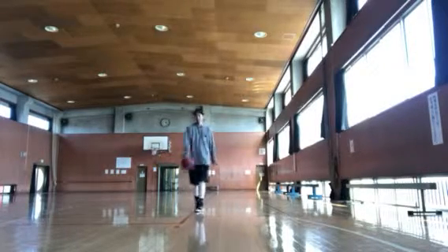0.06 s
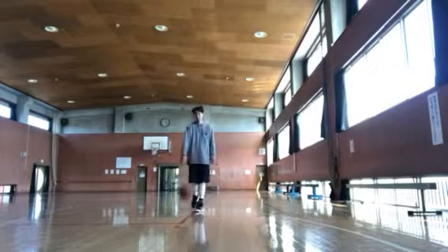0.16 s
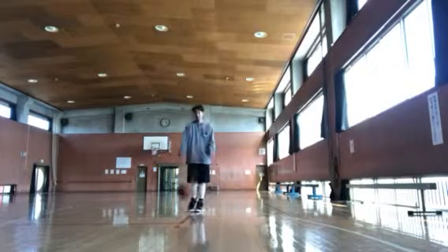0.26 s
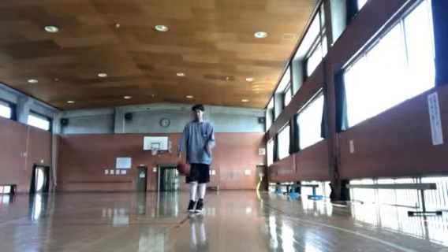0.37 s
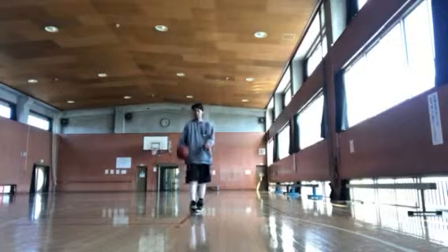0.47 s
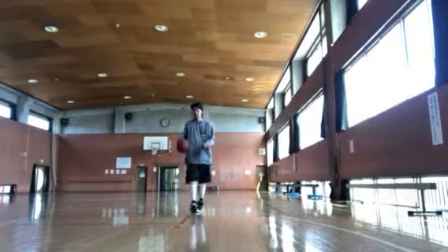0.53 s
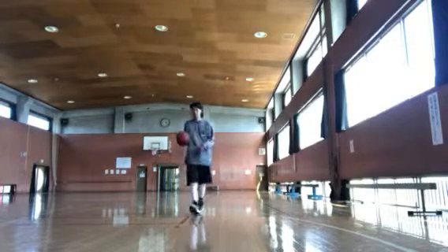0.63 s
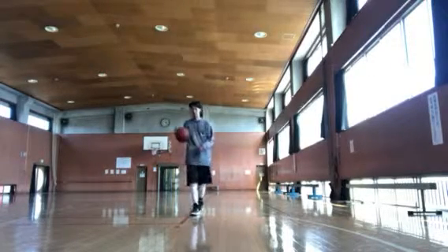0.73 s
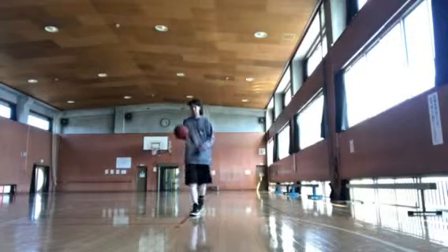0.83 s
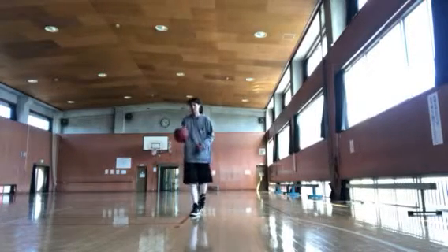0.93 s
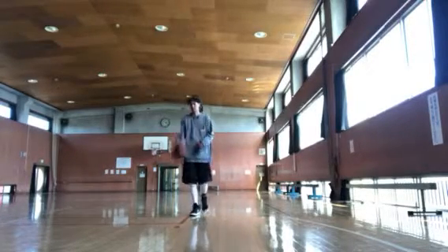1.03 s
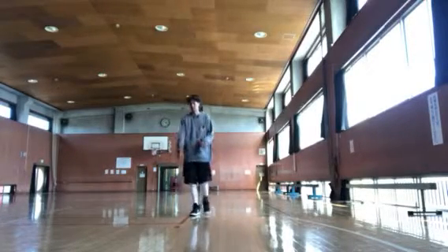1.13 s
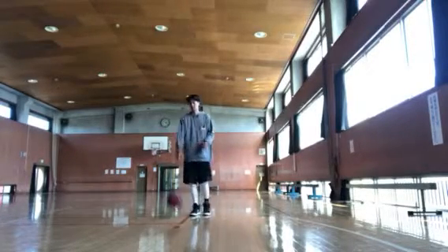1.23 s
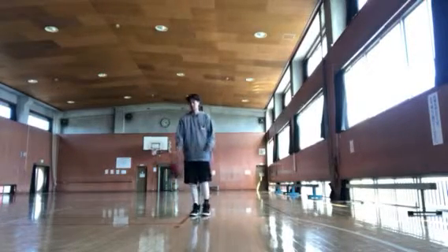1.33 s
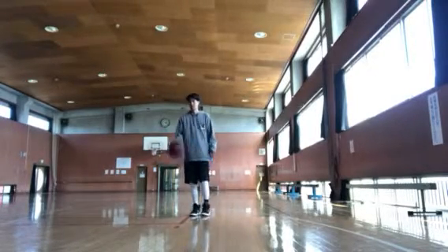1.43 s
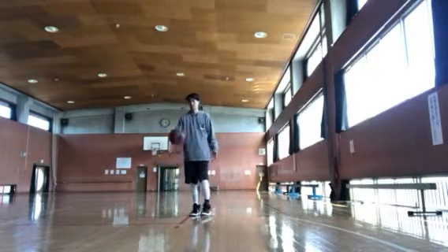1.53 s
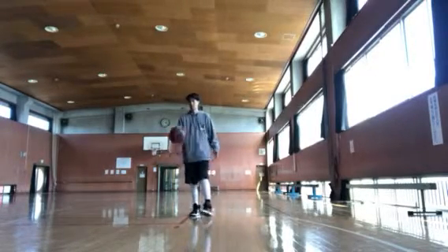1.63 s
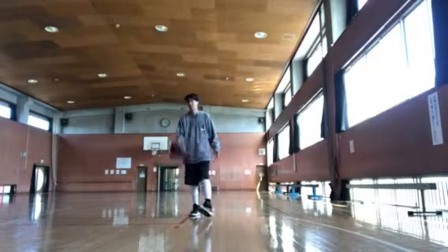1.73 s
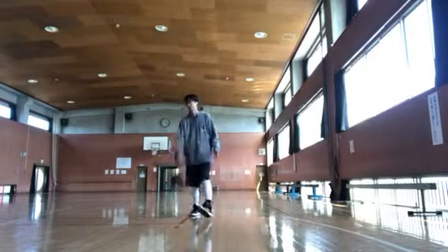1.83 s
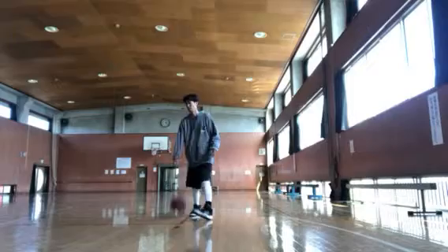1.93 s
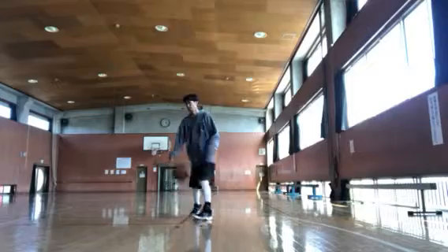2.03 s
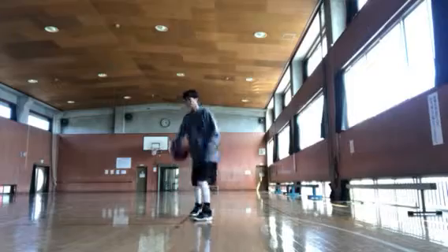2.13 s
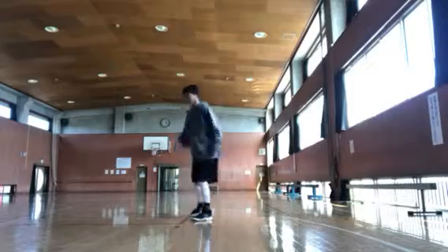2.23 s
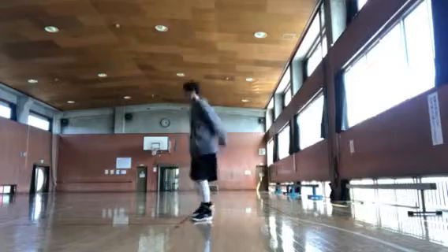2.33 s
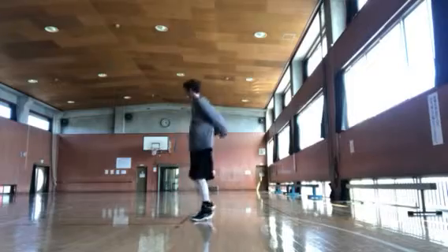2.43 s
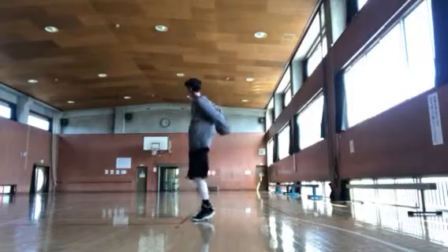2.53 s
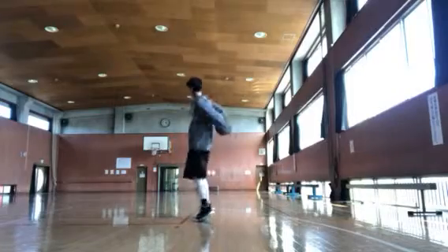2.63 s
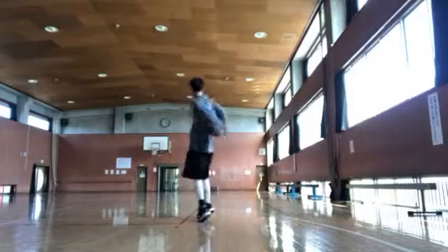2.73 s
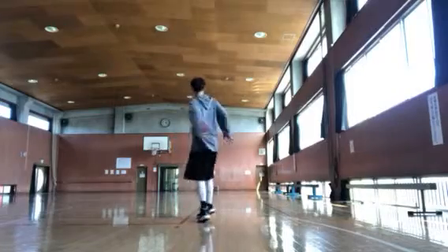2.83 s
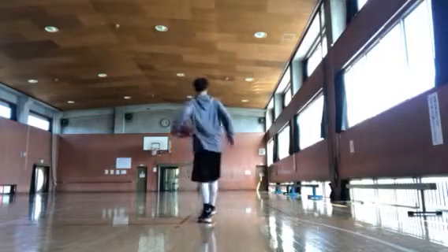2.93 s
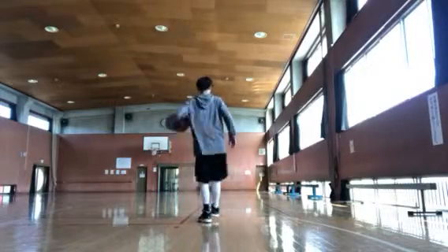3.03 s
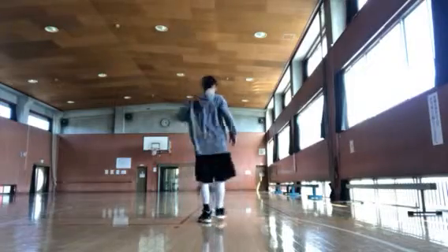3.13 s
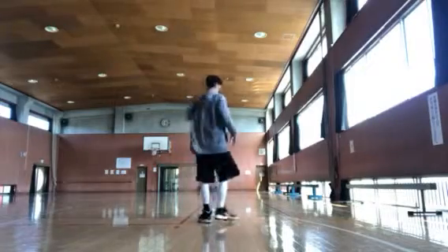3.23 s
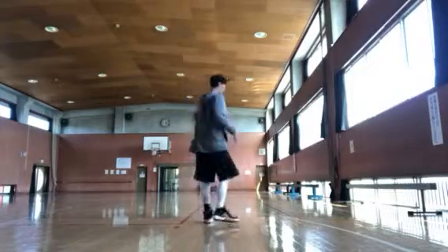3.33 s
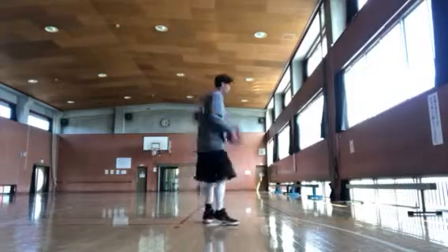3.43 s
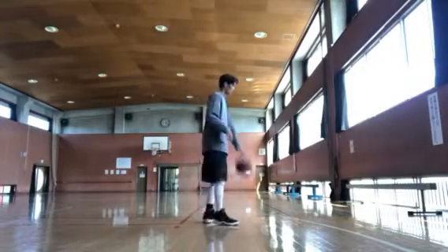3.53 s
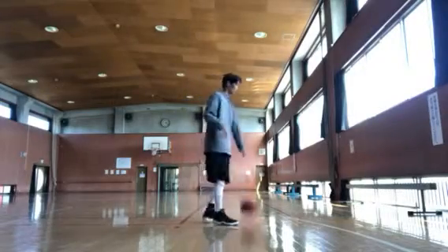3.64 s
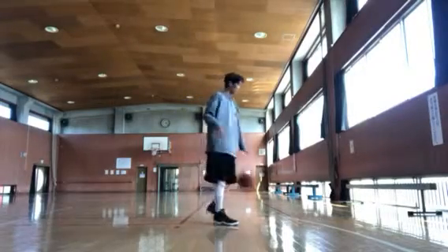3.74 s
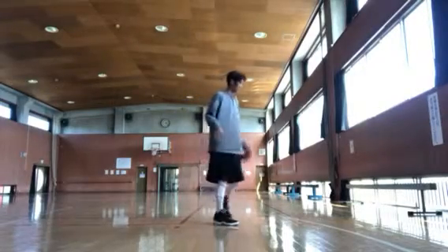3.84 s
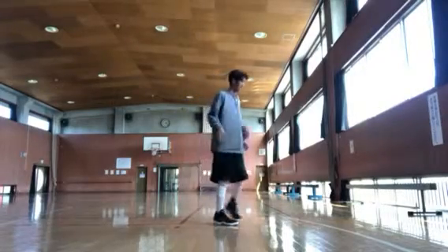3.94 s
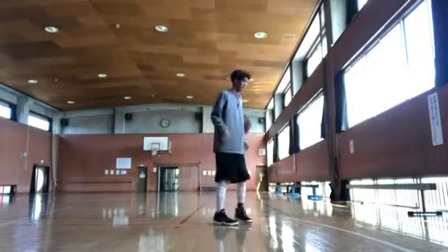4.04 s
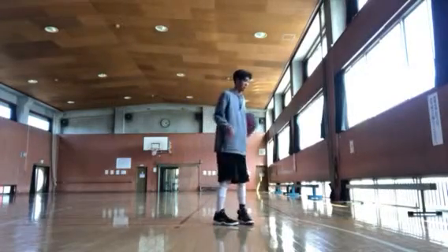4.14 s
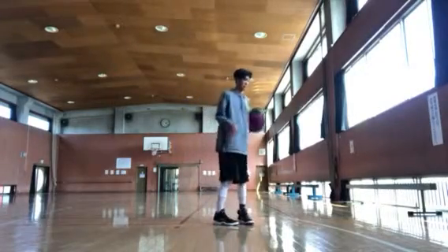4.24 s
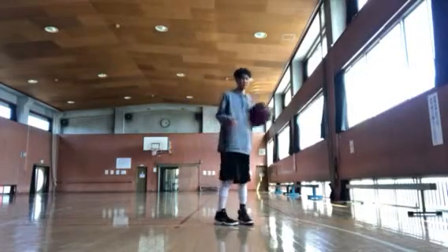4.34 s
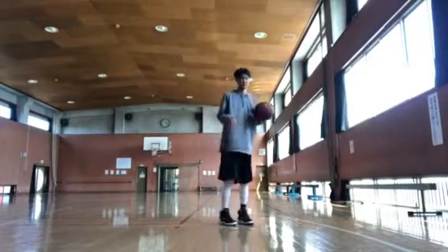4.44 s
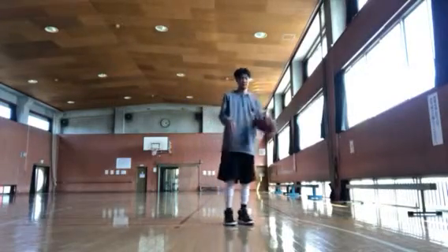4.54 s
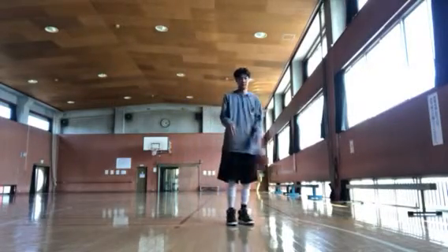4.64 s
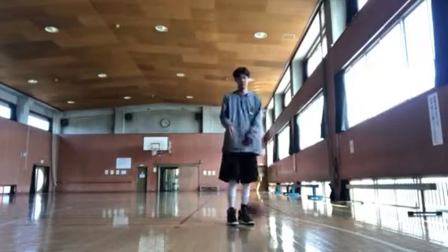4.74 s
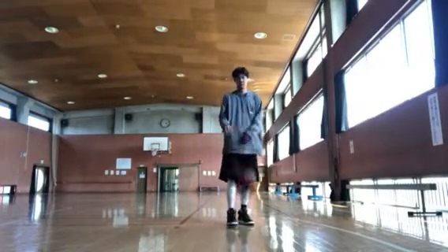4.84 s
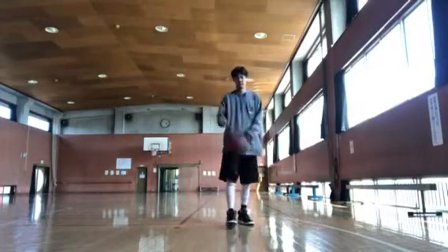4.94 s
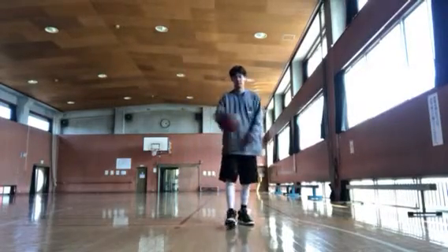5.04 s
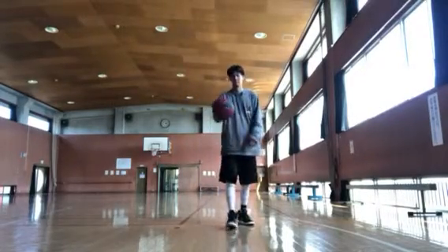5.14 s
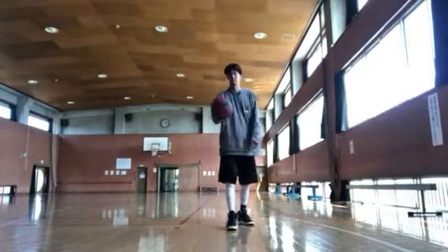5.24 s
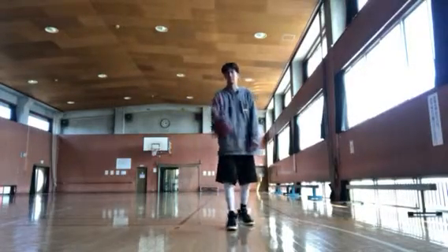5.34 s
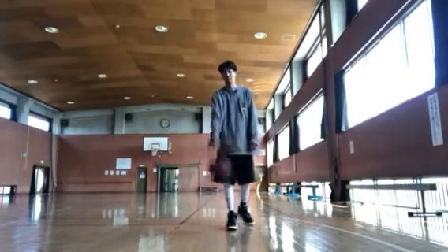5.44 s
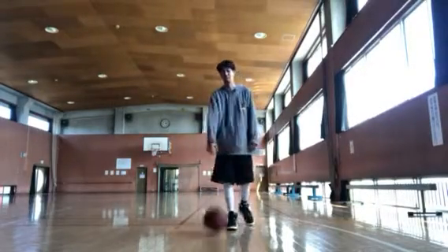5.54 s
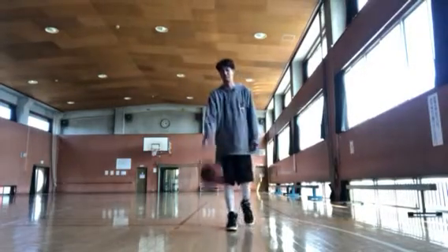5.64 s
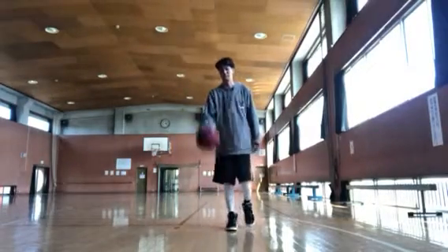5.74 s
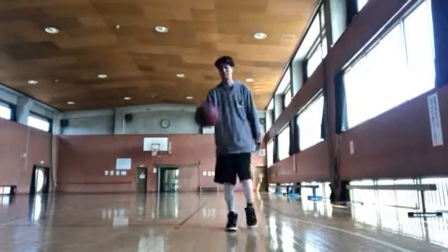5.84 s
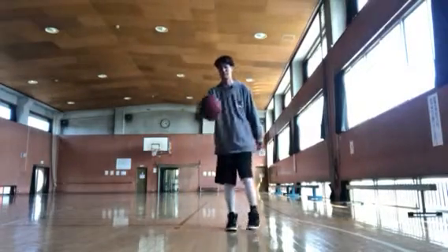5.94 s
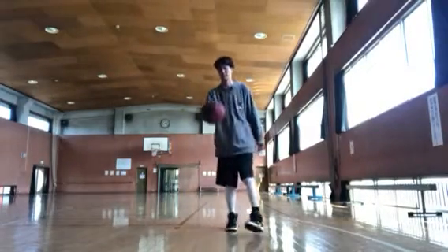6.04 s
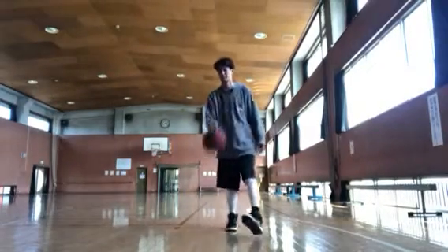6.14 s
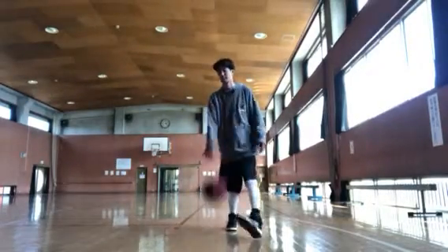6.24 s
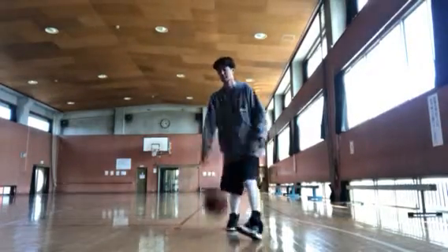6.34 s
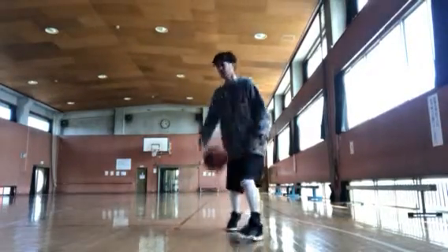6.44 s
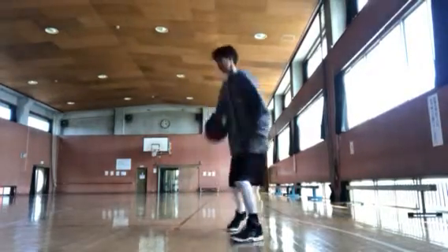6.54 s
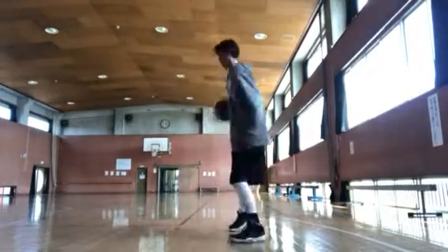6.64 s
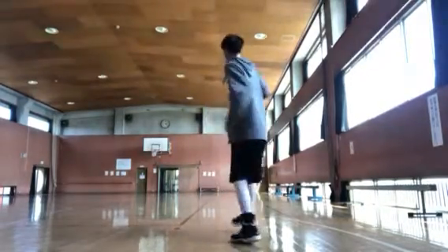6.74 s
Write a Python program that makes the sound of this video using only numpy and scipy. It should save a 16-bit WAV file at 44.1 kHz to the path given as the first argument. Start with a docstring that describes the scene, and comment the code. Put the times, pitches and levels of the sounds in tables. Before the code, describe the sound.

Unhurried basketball dribbling in a big empty gymnasium: sharp hollow slaps, floor rumble, fluttering echoes, light footsteps and one tiny shoe squeak.

```python
"""Basketball dribbling in a large gymnasium

A ball bounces seven times on the sprung wooden floor of an empty hall, the microphone lying on the boards.
Each bounce is a short slap of damped modes and a click, trains of bending-wave crests and a low rumble
in the floor, flutter pulses between end walls, and a long tail of noise decaying band by band.
Footfalls, and two late echoes of bounces, tap and thud by damped modes and noise; one sole squeaks in
a gliding tone; hiss, a thin whine and faint ticks lie beneath."""
import sys
import numpy as np
from scipy import signal
from scipy.fft import rfft, irfft, next_fast_len
from scipy.io import wavfile
from scipy.ndimage import uniform_filter1d

SR = 44100
rng = np.random.default_rng(int(sys.argv[2]) if len(sys.argv) > 2 else 0)


def store_pcm(level_fs):
    """Save levels as 16-bit WAV."""
    pcm = np.round(np.clip(level_fs, -1, 1) * 32767).astype(np.int16)
    wavfile.write(sys.argv[1], SR, np.atleast_2d(pcm).T)


def volts_from_decibels(level):
    """Turn decibel levels (scalar or array-like) into linear amplitude factors."""
    exponent = np.asarray(level, float) / 20
    return 10 ** exponent


N = 298998  # samples in the scene

# bounces: [t/s, slap level/dB, brightness/(dB per octave), hall level/dB, flutter level/dB,
# side wall return/dB re slap, ceiling return/dB re slap]
BOUNCES = [(.3524, -12, -1, -32.5, -34.5, -11, -26), (1.344, -11, -2, -34, -34.5, -13, -6.5),
           (2.0554, -10, 2, -32.5, -38, -16, -14), (3.7884, -12, 3, -32, -53, -6, -11),
           (4.8908, -9.5, 1.5, -30, -40.5, -7, -25), (5.6708, -7.5, 1.5, -31.5, -62, -8, -11.5),
           (6.4332, -8.5, 1, -31.5, -47, -11.5, -11)]
# a bounce before the start, of which only the echoes are heard: [t/s, hall level/dB, flutter level/dB]
EARLIER_BOUNCE = [-.367, -33, -38]
# distance from ball to microphone at each bounce: [r/m]
DISTANCE_M = np.array([8, 9, 8, 8.3, 6.1, 6.1, 4.1])
# modes of the air in the ball, before brightness: [f/Hz, level/dB, t60/s]
BALL_MODES = [(320, -6, 0.0074), (612, -10.5, 0.025), (936, 5.5, 0.014), (1467, 3, 0.0073),
              (1826, -2.5, 0.0097), (2392, 5, 0.0042)]
# spectrum of the crack, before brightness: [f/Hz, gain/dB]
CRACK_SPECTRUM = [(3000, -13.5), (4000, 12), (5200, -6.5), (7400, 1), (10000, -5.5), (12500, -14),
                  (15500, -20), (20000, -35.5)]
# relative spectrum of the near walls' reply: [f/Hz, level/(dB per Hz)]
NEAR_SPECTRUM = [(150, -38.5), (400, -24.5), (900, 3), (1200, 0.5), (2000, -5), (2600, -8), (3800, -26.5),
                 (5200, -41.5), (7500, -37.5), (15500, -59.5)]
# decay of the near walls' reply: [f/Hz, t60/s]
NEAR_T60 = [(500, 0.2), (2000, 0.19), (8000, .25)]
# floor wave train of each bounce: [t of first crest/s, crest spacing/s, deep mode level/dB,
# middle mode level/dB, upper mode level/dB, factor on the loss of middle and upper modes, rumble level/dB]
FLOOR_TRAINS = [(.384, .047, -18.5, -20, -23, 1.4, -21), (1.385, 0.052, -21, -15.5, -31.5, 1.2, -20.5),
                (2.094, 0.051, -21.5, -16.5, -31.5, 0.94, -23), (3.824, .045, -18, -23.5, -18.5, 0.95, -21),
                (4.914, .075, -20.5, -18, -20.5, 0.69, -16), (5.704, .02, -19, -12, -12, 0.32, -16.5),
                (6.467, 0.028, -19.5, -10, -10, 0.75, -15)]
# bending modes of the boards, before detuning: [f/Hz, swell time/s, t60/s]
BOARD_MODES = [(54.4, 0.015, 0.31), (85, 0.019, 0.019), (154.3, 0.0048, 0.04), (275.8, 0.01, 0.29),
               (312.1, 0.0045, 0.076)]
# each board mode in a train: [level in its group/dB, basic loss per crest/dB]
CREST_MODES = [(-6.5, 2.5), (-0.5, 3.5), (-0.5, 8), (-10.5, 8.5), (-0.5, 23)]
# each board mode in the faint wave that crests just ahead of the slap: [level/dB]
LEAD_DB = [-45, -40, -24, -45, -24]
# relative spectrum of the floor rumble: [f/Hz, level/(dB per Hz)]
RUMBLE_SPECTRUM = [(18, -60), (30, -27), (60, -3), (160, -2.5), (250, -10.5), (320, -7.5), (500, -13.5),
                   (800, -17), (1500, -63), (3000, -100)]
# decay of the floor rumble: [f/Hz, t60/s]
RUMBLE_T60 = [(50, 0.91), (100, 0.67), (200, 0.31), (400, 0.35), (1000, 0.52), (3000, 0.13)]
# relative spectrum of the hall: [f/Hz, level/(dB per Hz)]
HALL_SPECTRUM = [(18, -48), (30, -26.5), (49, 3), (75, 6), (172, -0.5), (342, -11), (604, -11), (907, -11),
                 (1180, -14.5), (2000, -21.5), (2500, -21), (3800, -39.5), (5200, -52.5), (7500, -47.5),
                 (15500, -77)]
# ball tones carried by the hall: [f/Hz, half-width/Hz, gain/dB]
HALL_RINGS = [(610, 25, 7), (825, 25, 5), (945, 40, 8), (1350, 55, 6), (1780, 90, 2), (2500, 250, 5)]
# decay of the hall: [f/Hz, t60/s]
HALL_T60 = [(50, 1.95), (120, 1.75), (300, 1.47), (700, 2.26), (1500, 2.185), (2500, 2.94), (3800, 1.6),
            (5000, 0.8), (10000, 0.66)]
# time constant of the hall's filling: [f/Hz, rise time/s]
HALL_RISE = [(200, 0.013), (900, 0.067), (2500, 0.11), (8000, 0.05)]
# lesser blows: footfalls, except two late echoes. That at 0.97 s is the flutter pulse of the first bounce
# on its fourth trip between end walls; that at 4.945 s is a strong late echo of the bounce at 4.89 s,
# with the floor booming again: [t/s, board level/dB, extra on the lowest sounding board mode/dB,
# tap level/dB, hardness/(dB per octave), thud level/dB]
LESSER_BLOWS = [(0.0664, -40, 4, -27.5, 2.5, -40), (0.127, -55, 12, -27.5, -5, -55),
                (.97, -64.5, -3, -35, -1, -65), (1.075, -61.5, -8, -56, -1, -68),
                (2.518, -33, -7, -29, -1.5, -42), (2.959, -56, -9, -52, -1, -56),
                (3.071, -54, -10, -37, -11, -55), (3.514, -47.5, -14, -40, -2, -47.5),
                (3.707, -54.5, -4, -42, -3, -59), (4.208, -47, 7, -55, -1, -47),
                (4.945, -18, 1.5, -15, -8, -37.5), (6.399, -44.5, 5, -47, -1, -58)]
# three upper board modes under a lesser blow: [relative level of first crest/dB, of second crest/dB]
BLOW_BOARD_MODES = [(3.2, -10), (-5, -8.5), (2.1, -25)]
# modes of the tap, before hardness: [f/Hz, level/dB, t60/s]
TAP_MODES = [(564, 3.5, 0.017), (1000, -3, 0.022), (1660, -6.5, 0.013), (2370, -3.5, 0.0055),
             (3200, -16.5, .004)]
# relative spectrum of the thud: [f/Hz, level/(dB per Hz)]
THUD_SPECTRUM = [(40, -7.5), (90, 0), (300, -5.5), (560, -3), (1000, -11), (2000, -30), (4000, -56.5)]
# decay of the thud: [f/Hz, t60/s]
THUD_T60 = [(80, 1.0), (300, 0.72), (1000, 0.13)]
# glide of the squeak, before uneven grip: [t/s, f/Hz, level/dB]
SQUEAK = [(3.49, 2990, -85), (3.497, 2876, -69), (3.513, 2530, -55.5), (3.535, 2460, -57),
          (3.543, 2665, -52.5), (3.549, 2940, -68), (3.554, 3200, -85)]
# relative spectrum of the hiss: [f/Hz, level/(dB per Hz)]
HISS_SPECTRUM = [(15, -34), (30, -15), (70, -1.5), (260, -13.5), (500, -4.5), (1000, -17.5), (1500, -17.5),
                 (2500, -20.5), (3600, -25), (4750, -28), (5050, -25.5), (5400, -29.5), (8000, -29.5),
                 (12000, -36), (15700, -37)]
# spectrum of an electrical tick: [f/Hz, gain/dB]
TICK_SPECTRUM = [(2000, -28), (4000, 0), (7000, 1.5), (9500, -9), (12000, -18)]
# centres of the bands that decay separately: [f/Hz]
BANDS_HZ = np.geomspace(40, 16000, 28)

PIVOT_HZ = 1010  # brightness turns the spectrum about this frequency


def unit(x):
    """Normalization: a signal scaled to rms 1."""
    return x / np.sqrt(np.mean(x ** 2) + 1e-20)


def along(points, hz):
    """Interpolation of (f/Hz, value) points on a logarithmic frequency axis."""
    f, value = np.transpose(points)
    return np.interp(np.log(hz + 1), np.log(f + 1), value)


def gain_of(spectrum):
    """Frequency response as linear gain, from a table in dB."""
    return lambda f: volts_from_decibels(along(spectrum, f))


def filtered(x, response):
    """Linear filtering: the spectrum is multiplied by a response of frequency."""
    m = next_fast_len(x.shape[-1] + 8192)
    spectrum = rfft(x, m) * response(np.fft.rfftfreq(m, 1 / SR))
    return irfft(spectrum, m)[..., :x.shape[-1]]


def add(track, s, sound):
    """Superposition of a sound on a track at time s."""
    part = track[round(s * SR):][:len(sound)]
    part += sound[:len(part)]


def ringing(modes, t):
    """Modal superposition: damped sines, of which the higher speak first, so the blow falls in pitch."""
    total = 0
    for hz, db, t60 in modes:
        onset = 1 - np.exp(-t * hz / 1.94)
        total = total + volts_from_decibels(db - 60 * t / t60) * np.sin(2 * np.pi * hz * t) * onset
    return total


def tilted(modes, slope_db, pivot_hz):
    """Spectral tilt: mode levels turned about a pivot by a slope in dB per octave."""
    return [(hz, db + slope_db * np.log2(hz / pivot_hz), t60) for hz, db, t60 in modes]


def tails(starts, db, gain, t60, rise):
    """Diffuse decay: noise bands swell and die at their own rates; db(hz) gives one level per start."""
    t = np.arange(0, N / SR + .002, .001)
    age = np.clip(t - np.reshape(starts, (-1, 1)), 0, None)
    m = next_fast_len(N)
    f = np.fft.rfftfreq(m, 1 / SR)
    noise = rfft(unit(filtered(rng.standard_normal(N), gain)), m)
    total = np.zeros(N)
    for k, hz in enumerate(BANDS_HZ):
        decay = volts_from_decibels(np.reshape(db(hz), (-1, 1)) - 60 * age / along(t60, hz))
        power = (decay * (1 - np.exp(-age / rise(hz)))) ** 2
        # overlapping bands whose shares sum to one
        share = along(list(zip(BANDS_HZ, np.arange(len(BANDS_HZ)) == k)), f)
        envelope = np.interp(np.arange(N) / SR, t, np.sqrt(power.sum(0)))  # energies of all starts add
        total += envelope * irfft(noise * share, m)[:N]
    return total


def slap_of(db, bright):
    """Impact excitation: the air in the ball rings just after a crack of expelled air."""
    t = np.arange(SR // 8) / SR
    # a brighter blow reaches higher
    muffle = signal.butter(4, 3180 + 233 * bright, fs=SR, output="sos")
    ring_late, crack_t60 = .0008, .004  # s
    ring = ringing(tilted(BALL_MODES, bright, PIVOT_HZ), np.clip(t - ring_late, 0, None))
    snap = .12 * volts_from_decibels(-60 * (t - .0005) / crack_t60) * (t > .0005) * rng.standard_normal(len(t))
    snap[22] = 1  # air squeezed from under the ball: one sharp click
    crack = filtered(snap, gain_of(CRACK_SPECTRUM))
    # the crack is tilted as if 1.1 octaves above the pivot
    return volts_from_decibels(db) * (signal.sosfilt(muffle, ring) + volts_from_decibels(1.1 * bright - 14.5) * crack)


def slaps():
    """Specular reflection: side wall and ceiling return each slap clearly, then many echoes faintly."""
    track = np.zeros(N)
    wall_m, ceiling_m = 8.67, 15.7  # sideways offsets of the mirrored ball
    wall_tilt, ceiling_tilt = 0.42, 0.4  # 0 thins a return, 1 dulls it; both here thin it a little
    sound_m_per_s = 343
    for (s, db, bright, *_, wall_db, ceiling_db), metres in zip(BOUNCES, DISTANCE_M):
        slap = slap_of(db, bright)
        add(track, s - .0006, slap)
        for offset, echo_db, tilt in [(wall_m, wall_db, wall_tilt), (ceiling_m, ceiling_db, ceiling_tilt)]:
            late = (np.hypot(metres, offset) - metres) / sound_m_per_s
            echo = signal.lfilter([1, tilt - 1], [1, -.9 * np.clip(tilt, 0, 1)], slap)
            add(track, s - .0012 + late, volts_from_decibels(echo_db) * echo)
        thin = signal.lfilter([1, -.8], [1], slap)
        for late, size in zip(rng.uniform(.015, .35, size=30), rng.standard_normal(30)):
            add(track, s + late, size * volts_from_decibels(-26.5 - 60 * late / 1.3) * thin)
    return track


def near_walls():
    """Early diffuse reflection: near walls answer each slap, more weakly for a more distant ball."""
    near_db = -23 - 1.9 * DISTANCE_M  # level at zero distance, and loss in dB per metre
    starts = [row[0] for row in BOUNCES]
    return tails(starts, lambda hz: near_db, gain_of(NEAR_SPECTRUM), NEAR_T60, lambda hz: .003)


def boards(s, levels_db, luck):
    """Modal bending wave: each mode, a little detuned, swells to its crest at s, then dies."""
    t = np.arange(SR // 3) / SR
    lead = .05  # s from the beginning of the sound to its crest
    late = t - lead
    wave = np.zeros(len(t))
    for (hz, swell, t60), db, (turn, detune) in zip(BOARD_MODES, levels_db, luck):
        if db < -70:  # too weak to be heard
            continue
        fade = volts_from_decibels(-60 * late ** 2 / np.abs(late + swell) / t60)
        shape = np.where(late < 0, np.exp(-(late / swell) ** 2), fade)
        detuned_hz = hz * (1 + 0.081 * (detune - .5))
        wave += volts_from_decibels(db) * shape * np.sin(2 * np.pi * (detuned_hz * t + turn))
    return s - lead, wave


def floor_waves():
    """Attenuated bending waves: a faint lead, then four crests on average ever weaker and duller."""
    track = np.zeros(N)
    mode_db, loss_db = np.transpose(CREST_MODES)
    modes = len(BOARD_MODES)
    scatter_db = 2.5  # standard deviation of each mode in each crest
    for (s, gap, deep_db, middle_db, upper_db, pace, _), (hit, *_) in zip(FLOOR_TRAINS, BOUNCES):
        first_db = mode_db + [deep_db, deep_db, middle_db, upper_db, upper_db]
        add(track, *boards(hit - .002, deep_db + np.array(LEAD_DB), rng.uniform(size=(modes, 2))))
        for trip in range(4):
            lost_db = [1, 1, pace, pace, pace] * loss_db * trip
            crest_db = first_db - lost_db + scatter_db * rng.standard_normal(modes)
            add(track, *boards(s + trip * gap, crest_db, rng.uniform(size=(modes, 2))))
    return track


def floor_rumble():
    """Dispersion: low bending waves travel slowest, so the rise time goes as one over root frequency."""
    s, rumble_db = np.transpose(BOUNCES)[0], np.transpose(FLOOR_TRAINS)[-1]
    # sound in wood outruns sound in air by a few ms
    return tails(s - .003, lambda hz: rumble_db, gain_of(RUMBLE_SPECTRUM), RUMBLE_T60,
                 lambda hz: 0.13 / np.sqrt(hz))


def hall():
    """Reverberation: far walls answer gradually and the room rings long in the colour of each blow."""
    earlier_s, earlier_db, _ = EARLIER_BOUNCE
    starts = [earlier_s] + [row[0] for row in BOUNCES + LESSER_BLOWS]

    def levels_db(hz):
        octaves = np.log2(np.clip(hz, 500, 3000) / PIVOT_HZ)
        bloom = 1.4 * (3000 < hz < 5200)  # octaves; extra hold of brightness on this band
        bounce_db = [row[3] + row[2] * (0.74 * octaves + bloom) for row in BOUNCES]
        return [earlier_db] + bounce_db + [row[-1] - 14 for row in LESSER_BLOWS]

    def colour(f):
        rings_db = sum(g / (1 + ((f - c) / w) ** 2) for c, w, g in HALL_RINGS)
        return volts_from_decibels(along(HALL_SPECTRUM, f) + rings_db)

    return tails(starts, levels_db, colour, HALL_T60, lambda hz: along(HALL_RISE, hz))


def flutter():
    """Flutter echo: a soft pulse shuttles between parallel end walls, a little fainter each trip."""
    track, t = np.zeros(N), np.arange(SR // 10) / SR
    round_trip = .154  # s
    earlier_s, _, earlier_db = EARLIER_BOUNCE
    for s, db in [(earlier_s, earlier_db)] + [(row[0], row[4]) for row in BOUNCES]:
        for trip, (detune, turn) in enumerate(rng.uniform(size=(7, 2)), 1):
            hz = 560 * (1 + 0.21 * (detune - .5))
            pulse = np.exp(-((t - .012) / 0.0054) ** 2) * np.sin(2 * np.pi * (hz * t + turn))
            arrival = s + trip * round_trip
            if arrival > 0:
                add(track, arrival, volts_from_decibels(db - 2.8 * trip) * pulse)
    return track


def lesser_blows():
    """Modal excitation: each footfall or late echo is a tap, a thud and two crests in the boards."""
    track, t = np.zeros(N), np.arange(SR // 10) / SR
    chances = rng.uniform(size=(len(LESSER_BLOWS), 2, len(BOARD_MODES), 2))
    for (s, db, low_db, tap_db, hard, _), luck in zip(LESSER_BLOWS, chances):
        for late, relative_db, chance in zip((0, .045), np.transpose(BLOW_BOARD_MODES), luck):
            upper_db = db + relative_db + [low_db, 0, 0]
            # the two deepest modes stay silent
            add(track, *boards(s + 0.01428 + late, [-120, -120, *upper_db], chance))
        add(track, s, volts_from_decibels(tap_db) * ringing(tilted(TAP_MODES, hard, TAP_MODES[0][0]), t))
    s, *_, thud_db = np.transpose(LESSER_BLOWS)
    return track + tails(s, lambda hz: thud_db, gain_of(THUD_SPECTRUM), THUD_T60, lambda hz: .006)


def squeak():
    """Stick-slip friction: rubber slips on varnish in a gliding tone, which the hall holds."""
    s, hz, db = np.transpose(SQUEAK)
    t = np.arange(N) / SR
    phase = 2 * np.pi * np.cumsum(np.interp(t, s, hz)) / SR
    tone = volts_from_decibels(np.interp(t, s, db, -150, -150)) * np.sqrt(2) * np.sin(phase)
    grip = unit(uniform_filter1d(rng.standard_normal(N), size=130))
    tone = tone * volts_from_decibels(3 * grip)  # uneven grip, 3 dB rms
    age = np.arange(SR) / SR
    echo = rng.standard_normal(SR) * volts_from_decibels(-60 * age / 3) * (1 - np.exp(-age / .05))
    return tone + volts_from_decibels(0.5) * signal.fftconvolve(tone, echo / np.linalg.norm(echo))[:N]


def hiss():
    """Stationary random noise, shaped by its spectrum."""
    return volts_from_decibels(-65.5) * unit(filtered(rng.standard_normal(N), gain_of(HISS_SPECTRUM)))


def whine():
    """Phase diffusion: a thin steady tone whose phase wanders at random."""
    t = np.arange(N) / SR
    wander = .025 * np.cumsum(rng.standard_normal(N))  # rad
    return volts_from_decibels(-90.5) * np.sin(2 * np.pi * 5039 * t + wander)


def ticks():
    """Periodic impulses: filtered electrical ticks, twenty a second, uneven in level."""
    track = np.zeros(N)
    times = np.arange(.039, N / SR, .05)
    track[(times * SR).astype(int)] = volts_from_decibels(1.5 * rng.standard_normal(len(times)))
    return volts_from_decibels(-46.0) * filtered(track, gain_of(TICK_SPECTRUM))


def scene():
    """Superposition of all sources at one microphone."""
    bounces = slaps() + near_walls() + floor_waves() + floor_rumble()
    return (bounces + hall() + flutter() + lesser_blows() + squeak())[None]


def low_pass(x):
    """Removes everything above the highest recorded frequency."""
    return signal.sosfilt(signal.butter(12, 15805, fs=SR, output="sos"), x)


def record(dry):
    """High-pass transduction: the small microphone loses the deepest bass; whine and ticks are added."""
    heard = filtered(dry + hiss(), lambda f: (1j * f / (42 + 1j * f)) ** 2)
    return low_pass(heard + whine() + ticks())


dry = scene()
out = record(dry)
store_pcm(out)
```